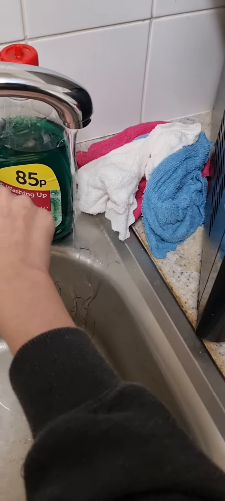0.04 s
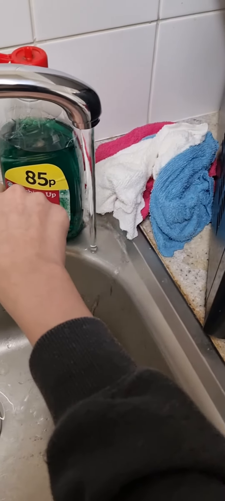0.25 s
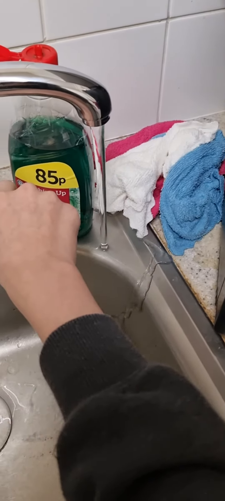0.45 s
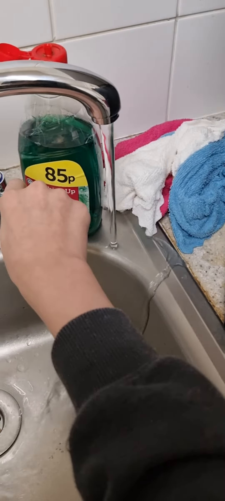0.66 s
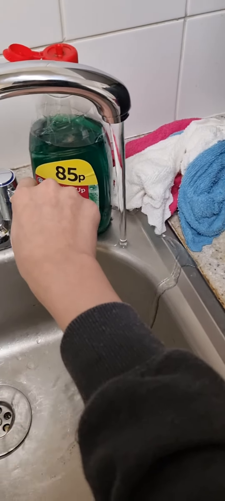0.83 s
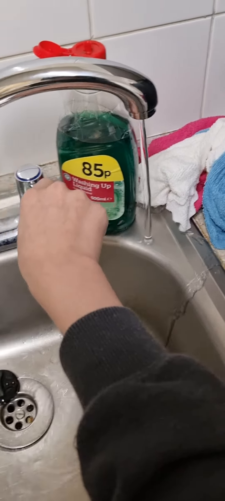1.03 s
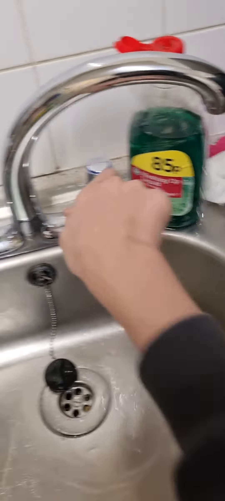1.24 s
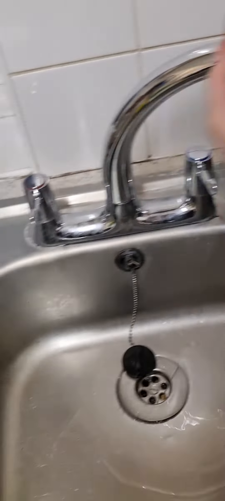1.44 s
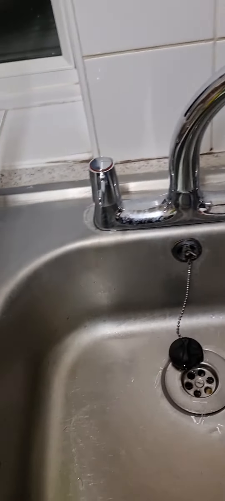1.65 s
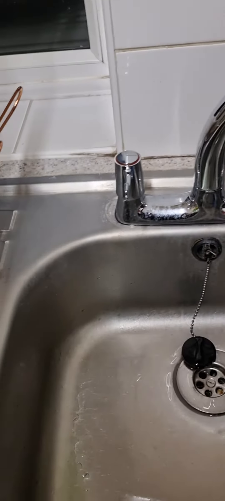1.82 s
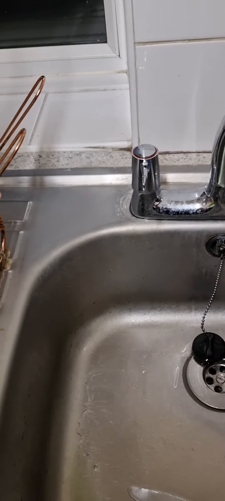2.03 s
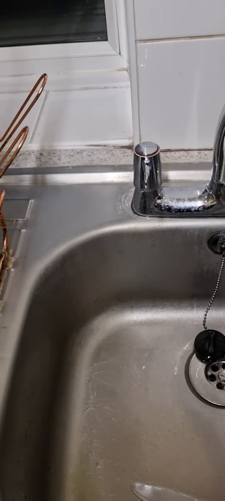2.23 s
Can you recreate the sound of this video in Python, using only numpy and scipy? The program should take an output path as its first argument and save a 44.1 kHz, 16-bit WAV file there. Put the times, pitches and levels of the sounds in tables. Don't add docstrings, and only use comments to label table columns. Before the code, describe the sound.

Running tap water splashes on a metal basin, stops abruptly with a pipe knock, then last drips plip

```python
import sys
import numpy as np
from scipy import signal
from scipy.fft import rfft, irfft, next_fast_len
from scipy.io import wavfile
from scipy.ndimage import uniform_filter1d, map_coordinates

SR = 44100
rng = np.random.default_rng(int(sys.argv[2]) if len(sys.argv) > 2 else 0)


def invert_db(x):
    u = np.asarray(x, float) / 20
    return 10 ** u


def master(y):
    cut = np.clip(np.atleast_2d(y).T, -1, 1)
    pcm = np.round(cut * 32767)
    wavfile.write(sys.argv[1], SR, pcm.astype(np.int16))


N = 100503
TIME = np.arange(N) / SR


def unit(x):
    return x / np.sqrt(np.mean(x ** 2) + 1e-20)


def along(points, hz):
    f, v = np.transpose(points)
    return np.interp(np.log(hz + 1), np.log(f + 1), v)


def wobble(rate_hz):
    return map_coordinates(rng.standard_normal(int(N * rate_hz / SR) + 4), [TIME * rate_hz])


def swells(rows):
    return sum(invert_db(db) * np.exp(-((TIME - s) / half_s) ** 2) for s, half_s, db in rows)


def sides(db):
    return invert_db(np.array([db / 2, -db / 2]))


def add(out, s, x):
    i = round(s * SR)
    out[:, i:i + x.shape[-1]] += x[..., :N - i]


def filtered(x, response):
    m = next_fast_len(x.shape[-1] + SR // 2)
    spectrum = rfft(x, m) * response(np.fft.rfftfreq(m, 1 / SR))
    return irfft(spectrum, m)[..., :x.shape[-1]]


def resonances(modes):
    def response(f):
        total = 0
        for k, (hz, width_hz, db) in enumerate(modes):
            damping = 1j * f * width_hz
            peak = damping / (hz * hz - f * f + damping)
            total = total + (-1) ** k * invert_db(db) * peak * np.sqrt(30 / width_hz)
        return total
    return response


def rush(response, patchy_db, pair=None, alike=None):
    # hz, correlation
    wet_alike = [(180, 1), (550, 0.6), (1650, 0.41), (4970, 0.18), (15000, 0.45)]
    if alike is None:
        alike = wet_alike
    if pair is None:
        pair = rng.standard_normal((2, N))
    z = signal.stft(pair, nperseg=512)[2]
    field = uniform_filter1d(rng.standard_normal(z.shape[1:]), size=6, axis=0)
    field = uniform_filter1d(field, size=8, axis=1)
    pair = signal.istft(z * invert_db(patchy_db * unit(field)), nperseg=512)[1][:, :N]

    def mid_side(hz):
        angle = np.arccos(np.clip(along(alike, hz), -1, 1)) / 2
        return response(hz) * np.array([np.cos(angle), np.sin(angle)])

    mid, side = filtered(pair, mid_side)
    return unit(np.array([mid + side, mid - side]))


def ring(modes, gains, attack_s):
    t = TIME[:SR // 3]
    chance = rng.standard_normal((len(modes), 2)) * [1.5, 0.008]
    out = np.zeros(len(t))
    for (hz, db, t60_s), gain, (off_db, detune) in zip(modes, gains, chance):
        decay = invert_db(db + off_db - 60 * t / t60_s)
        out += gain * decay * np.sin(2 * np.pi * hz * (1 + detune) * t)
    return out * (1 - np.exp(-t / attack_s))


def splash(drops):
    # hz, level_db per Hz
    steel_points = [(150, -40), (300, -11.5), (700, -11), (1450, -15), (2000, -6.5), (2500, -3.5),
                    (4200, -2), (9000, -13.5), (15000, -42)]
    # centre_hz, width_hz, level_db
    basin_modes = [(559, 22, -5), (800, 60, -9), (960, 60, -9), (1800, 30, -6), (1959, 20, -6),
                   (2130, 22, -5), (2444, 30, 1), (2670, 25, -1), (3230, 30, 1), (3558, 20, -1),
                   (3753, 22, -2), (4064, 25, 0), (4465, 20, -2), (5150, 30, -2)]
    spray_db, basin_db = -13, -4.5
    steel = lambda hz: invert_db(along(steel_points, hz))
    stream = invert_db(1.1 * wobble(25)) * rush(steel, 2.9)
    spray = invert_db(spray_db) * rush(steel, 0.5, drops)
    return stream + spray + invert_db(basin_db) * rush(resonances(basin_modes), 3.9)


def jet(drops):
    # hz, level_db per Hz
    hiss_points = [(3000, -35), (3200, -9), (5500, -2), (8000, -6.5), (11200, -0.5), (13400, -0.5),
                   (15300, -3), (15900, -4.5)]
    # centre_hz, width_hz, level_db
    spout_modes = [(8760, 40, -9), (10200, 25, -7), (11036, 22, 0), (12715, 40, -4), (14000, 50, -7),
                   (14669, 22, 0), (15337, 35, -4)]
    spray_db, spout_db = -4.5, -7
    hiss = lambda hz: invert_db(along(hiss_points, hz))
    whistle = lambda hz: resonances(spout_modes)(hz) * (hz > 3200)
    flow_noise = invert_db(1.5 * wobble(30)) * rush(hiss, 2.5)
    spray = invert_db(spray_db) * rush(hiss, 1.5, drops)
    return flow_noise + spray + invert_db(spout_db) * rush(whistle, 2.0)


def basin_boom():
    # centre_s, half_length_s, level_db
    booms = [
        (.1, 0.017, -53),
        (.15, 0.087, -51),
        (.4, 0.28, -60),
        (.72, 0.15, -59.5),
        (.94, 0.028, -47.5),
        (1.73, 0.029, -57.5),
    ]
    floor_mode = resonances([(190, 45, 0)])
    return swells(booms) * rush(lambda hz: floor_mode(hz) ** 2, 1.3)


def water():
    # time_s, flow_db, throttling_db
    flow = [(0, -58, 9.5), (.08, -53.5, 9.5), (0.142, -40, -1), (.3, -40, -1.5), (.5, -39, 4.5),
            (.62, -38, 1), (.75, -39.5, 2), (0.931, -36, -3.5), (.98, -41.5, -3), (1.03, -67, 5.5),
            (1.1, -76, 3)]
    # hz, left_right_db
    lean = [(60, -5.5), (180, -2), (550, -6), (1650, -2.5), (4970, 1.0), (15000, 4)]
    # hz, left_lead_rad
    leads = [(0, 0.5), (1550, -0.76), (4390, 14), (6290, 10.5), (11000, 40.5), (11300, 46.5), (14000, 30),
             (16500, 31.5)]
    closed_s, drain_db_per_s = 1.2, 126
    spurt_s, spurt_length_s, spurt_peak_db = 0.346, 0.02, 7.5
    lands_s, landing_s, before_db = 0.082, 0.064, -9
    drops_per_s = 4400

    s, *columns = np.transpose(flow)
    flow_db, valve_db = [np.interp(TIME, s, c) for c in columns]
    flow_db = flow_db - drain_db_per_s * np.clip(TIME - closed_s, 0, None)
    spurt_db = spurt_peak_db * np.exp(-((TIME - spurt_s) / spurt_length_s) ** 2)
    landing_db = before_db * np.clip((lands_s - TIME) / landing_s, 0, 1)

    hits = rng.random((2, N)) < drops_per_s / SR
    size_db = 5.5 * rng.exponential(size=(2, N)).clip(0, 3)
    drops = hits * rng.standard_normal((2, N)) * invert_db(size_db)
    both = invert_db(flow_db + 0.1 * spurt_db + landing_db) * splash(drops)
    both = both + invert_db(flow_db + valve_db + spurt_db) * jet(drops[::-1])
    both = both + basin_boom()

    def placement(hz):
        phase = 0.5j * along(leads, hz) * [[1], [-1]]
        return sides(along(lean, hz)) * np.exp(phase)

    return filtered(both, placement)


def knocks(events, modes, pan_db, attack_s=0.0035):
    out, hz = np.zeros((2, N)), np.transpose(modes)[0]
    for s, db, tilt_db in events:
        gains = invert_db(tilt_db * np.log2(hz / hz[0]))
        add(out, s, invert_db(db) * sides(pan_db)[:, None] * ring(modes, gains, attack_s))
    return out


def pipe_hammer():
    # start_s, level_db, brightness_db_per_octave
    blows = [
        (1.056, -49, 5),
        (1.061, -36, 1.5),
        (1.075, -47, -0.5),
        (1.082, -45, 4),
        (1.092, -46.5, 3.5),
        (1.102, -48.5, 1.5),
        (1.124, -45.5, -0.5),
        (1.163, -49, 2.5),
        (1.219, -36.5, -5),
        (1.267, -54, -8.5),
    ]
    # hz, level_db, t60_s
    pipe_modes = [(107, -3.5, 0.16), (200.6, 6.5, 0.032), (250, 0, 0.051), (300.5, 3, 0.035),
                  (573, -12.5, 0.094), (708, -5.5, 0.049), (858, -4, 0.039), (1013, -1.5, 0.027),
                  (1225, -9.5, 0.027)]
    return knocks(blows, pipe_modes, -4.5)


def drips():
    # start_s, level_db, pitch_hz, snap_db
    falls = [(1.4649, -42, 1830, -13), (1.5578, -38.5, 1890, -2.5), (1.6005, -45.5, 2100, 5),
             (1.626, -53.5, 4420, -30), (1.6408, -39, 1630, -6), (1.7206, -49, 1830, -14),
             (1.7205, -58, 3830, -30), (1.7468, -48.5, 1770, -2.5), (1.7543, -40.5, 1640, -20),
             (1.7631, -39.5, 1597, -11), (1.777, -46, 1630, -26), (1.798, -59.5, 4070, -32),
             (1.799, -55, 1750, -2), (1.82, -60, 2620, -6), (1.8446, -61, 1630, -12.5),
             (1.901, -54, 2070, -4), (1.905, -58, 1616, -25), (1.9247, -54.5, 1720, 1.5),
             (1.9372, -47.5, 1604, -2), (1.944, -57, 2820, -17), (2.01, -58.5, 2850, -12),
             (2.0544, -59.5, 1610, -11.5), (2.14, -45, 2765, -25.5), (2.205, -53, 2970, -22),
             (2.247, -55, 1680, -1)]
    # hz, level_db, t60_s
    waste_modes = [(950, 0, .08), (1520, -3, .06), (1625, 0, .085), (1720, -3, .07), (1840, 0, .085),
                   (1960, -2, .05), (2100, -4, .05), (2670, -5, .05), (2820, -1, .1), (3900, 0, .04),
                   (4570, 0, .04)]
    # hz, level_db, t60_s
    grate_modes = [(2560, -22, .04), (2690, -6, 0.048), (2850, -9, .06)]
    peak_s, sag, plip_db, reach_oct = 0.0023, 0.034, 0.5, 0.26
    echo_s, echo_jitter_s, echo_db = 0.0088, 0.000605, -6
    snap_top_hz, snap_fall_s, snap_t60_s = 3130, 0.0021, 0.02
    pipe_ring_db, drip_room_db = -2.5, -8

    out, hz, t = np.zeros((2, N)), np.transpose(waste_modes)[0], TIME[:SR // 3]
    for s, db, pitch_hz, snap_db in falls:
        u = t / peak_s
        sagging_s = t + sag * peak_s * (1 - np.exp(-u))
        once = u * np.exp(0.5 - u ** 2 / 2) * np.sin(2 * np.pi * pitch_hz * sagging_s)
        trip = np.arange(5)
        late_s = echo_s * trip + echo_jitter_s * rng.standard_normal(5) * trip
        plip = sum(invert_db(plip_db + k * echo_db) * np.roll(once, round(d * SR)) for k, d in enumerate(late_s))

        fall_hz = max(snap_top_hz - pitch_hz, 0)
        turns = pitch_hz * t + fall_hz * snap_fall_s * (1 - np.exp(-t / snap_fall_s))
        snap = invert_db(1 - 60 * t / snap_t60_s) * np.sin(2 * np.pi * turns)
        snap = snap * (1 - np.exp(-t / 0.0005)) ** 2
        snap = snap + ring(grate_modes, np.ones(len(grate_modes)), 0.00089)

        near = np.exp(-(np.log2(hz / pitch_hz) / reach_oct) ** 2)
        pipe = invert_db(pipe_ring_db) * ring(waste_modes, near, 0.0018)
        pan_db = 3.0 if pitch_hz < 1700 else -2.2
        x = invert_db(db - 6.5) * sides(pan_db)[:, None] * (pipe + plip + invert_db(snap_db) * snap)
        add(out, s, x + invert_db(drip_room_db) * room(x)[:, :len(t)])
    return out


def ticks():
    # start_s, level_db, centre_hz, t60_s, room_db
    contacts = [(1.1625, -29.5, 8000, 0.036, -6.5), (1.5245, -48, 8700, 0.028, -7),
                (1.533, -55, 5600, .02, -6.5), (1.558, -59, 4800, 0.017, -8.5),
                (1.576, -65, 9830, 0.011, -13.5), (1.6006, -63, 9400, 0.016, -9),
                (1.6257, -57, 9500, 0.022, -11.5), (1.6409, -57, 11000, .02, -9),
                (1.7203, -66, 9360, 0.014, -11), (1.7468, -66, 9600, .015, -12),
                (1.7802, -65, 9400, .02, -8), (1.926, -53.5, 9400, .02, -13.5),
                (1.9633, -68, 6000, .01, -13), (1.9845, -64, 13500, .01, -14),
                (2.1166, -55, 8400, 0.014, -11.5), (2.163, -44.5, 12300, 0.031, -11.5),
                (2.182, -50, 9430, 0.024, -11), (2.2385, -48, 8440, .01, -18)]
    wide_db = 1.5
    out, t = np.zeros((2, N)), TIME[:SR // 3]
    for s, db, hz, t60_s, room_db in contacts:
        grains = rng.standard_normal((2, len(t))) * (rng.random(len(t)) < 0.45)
        puff = grains * invert_db(3 - 60 * t / t60_s)
        body = resonances([(hz, 0.11 * hz, 17)])

        def colour(f):
            wide = invert_db(wide_db) / (1 + (f / 11000) ** 2)
            return (1.5 * body(f) + wide) * f ** 2 / (f ** 2 + 3500 ** 2)

        x = invert_db(db) * filtered(puff, colour)
        add(out, s, x + invert_db(room_db) * room(x)[:, :len(t)])
    return out


def rim_clack():
    # start_s, level_db, brightness_db_per_octave
    touches = [
        (2.163, -45, -2.5),
        (2.1745, -50.5, 0.5),
    ]
    # hz, level_db, t60_s
    rim_modes = [(929, -3, 0.091), (1013, -12, .1), (1146, -12, .1), (1557, -4.5, 0.067),
                 (1736, -15.5, 0.3), (1850, -7, 0.053), (2290, -15, .04), (2805, -7, 0.09),
                 (3150, -17, 0.055)]
    return knocks(touches, rim_modes, 1.1, attack_s=0.0005)


def worktop_thuds():
    # start_s, level_db, brightness_db_per_octave
    landings = [
        (2.184, -31, -1),
        (2.205, -39.5, -3.5),
        (2.224, -45, -2.5),
        (2.262, -56, 11),
    ]
    # hz, level_db, t60_s
    worktop_modes = [(206, -1.5, 0.15), (240, -1, 0.079), (340, -5, 0.12), (444, -6.5, 0.12),
                     (554, -20, 0.13), (642, -18.5, 0.28), (688, -15.5, 0.19), (803, -27, 0.28),
                     (907, -25, 0.056)]
    return knocks(landings, worktop_modes, -2.7)


def house():
    # hz, level_db per Hz
    floor_points = [(30, -32.5), (70, -22.5), (130, -11), (250, -22.5), (1000, -30), (3000, -40.5),
                    (7000, -51), (15900, -52.5)]
    # centre_hz, width_hz, level_db
    fridge_modes = [(41, 17, -1.5), (60.4, 9.4, -1), (106.8, 24, -2)]
    # centre_s, half_length_s, level_db
    sleeve = [
        (.04, .07, -56),
        (1.15, 0.12, -52.5),
        (1.715, 0.05, -56),
        (1.783, 0.037, -65),
        (1.92, 0.12, -61.5),
        (2.21, 0.081, -53),
    ]
    # hz, level_db per Hz
    cloth_points = [(50, -45), (100, 6.5), (250, -5.5), (500, -6.5), (1200, -14), (1800, -16.5),
                    (8000, -42.5)]
    near = [(60, 0.99), (150, 0.96), (400, 0.7), (1000, 0.19)]  # hz, correlation
    floor_db, hum_db = -64, -53.0
    fridge = lambda hz: sum(resonances([mode])(hz) ** 2 for mode in fridge_modes)
    floor = invert_db(floor_db) * rush(lambda hz: invert_db(along(floor_points, hz)), 1.8, alike=near)
    hum = invert_db(hum_db) * rush(fridge, 1.0, alike=near)
    cloth = rush(lambda hz: invert_db(along(cloth_points, hz)), 2.5, alike=near)
    return floor + hum + swells(sleeve) * invert_db(2.78 * wobble(40)) * cloth


def room(x):
    # hz, t60_s
    kitchen = [(200, 0.46), (2000, 0.39), (8000, 0.3), (15000, 0.13)]
    hz, t, z = signal.stft(rng.standard_normal((2, SR // 2)), SR, nperseg=256)
    z[1] = np.where(hz[:, None] < 400, z[0], z[1])
    decay = invert_db(-60 * t / along(kitchen, hz)[:, None])
    tail = signal.istft(z * decay, SR, nperseg=256)[1]
    delayed = np.pad(x, ((0, 0), (150, 0)))
    return signal.fftconvolve(delayed, tail / np.linalg.norm(tail[0]), axes=1)[:, :N]


def scene():
    room_db = -6
    wet = water() + pipe_hammer() + worktop_thuds() + rim_clack()
    return wet + invert_db(room_db) * room(wet) + drips() + ticks() + house()


def top_cut(x):
    return signal.sosfilt(signal.butter(12, 16940, fs=SR, output="sos"), x)


def record(dry):
    fade_s, low_hz, top_hz = 0.006, 33, 15820
    faded = dry * np.clip((TIME[-1] - TIME) / fade_s, 0, 1)
    band = lambda hz: invert_db(-42 * (hz > top_hz)) * hz ** 4 / (hz ** 4 + low_hz ** 4)
    return top_cut(filtered(faded, band))


dry = scene()
out = record(dry)
master(out)
```